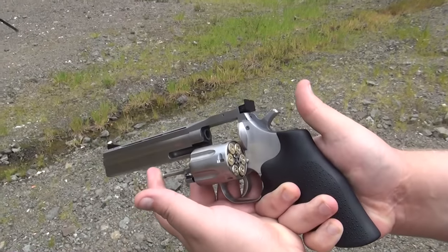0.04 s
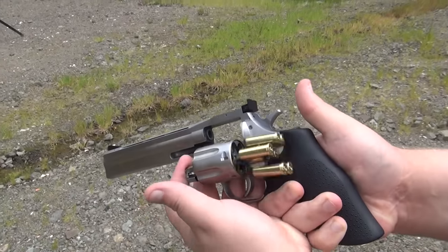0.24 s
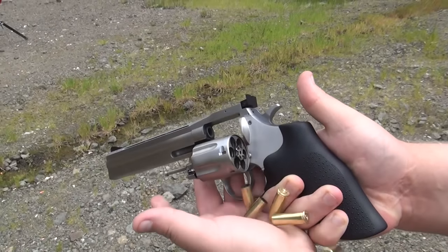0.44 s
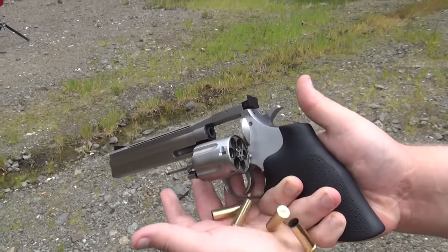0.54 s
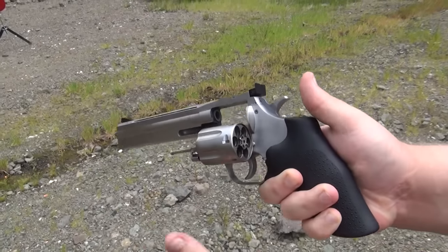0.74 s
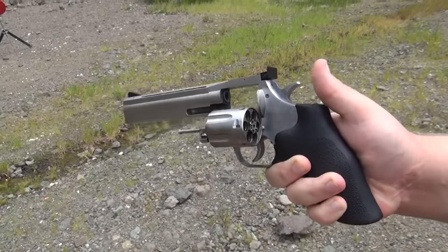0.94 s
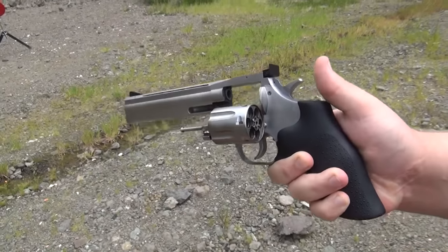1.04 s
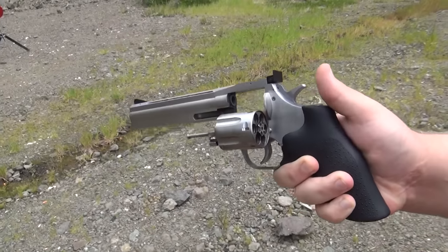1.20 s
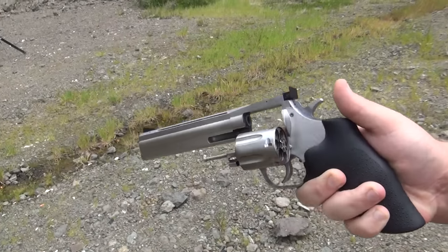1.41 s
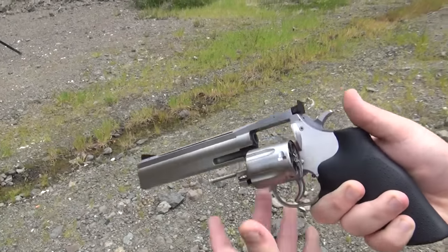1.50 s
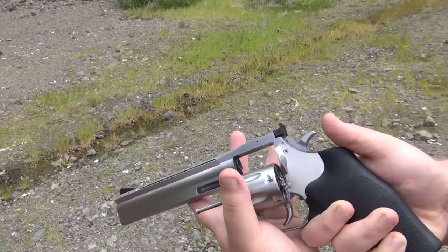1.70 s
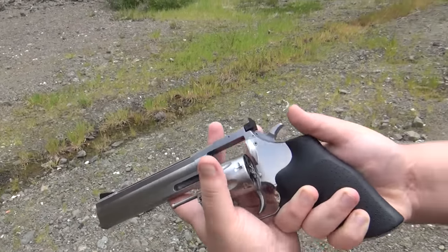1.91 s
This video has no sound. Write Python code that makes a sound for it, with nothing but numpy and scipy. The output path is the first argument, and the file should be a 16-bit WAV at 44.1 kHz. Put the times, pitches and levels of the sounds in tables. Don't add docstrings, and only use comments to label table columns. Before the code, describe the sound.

Spent brass cases clatter and ring as they are ejected from a revolver cylinder into a palm

```python
import sys
import numpy as np
from scipy import signal
from scipy.fft import rfft, irfft, next_fast_len
from scipy.io import wavfile
from scipy.ndimage import map_coordinates

SR = 44100
rng = np.random.default_rng(int(sys.argv[2]) if len(sys.argv) > 2 else 0)


def transcribe(signal):
    frames = np.atleast_2d(signal).T
    limited = np.clip(frames, -1, 1)
    pcm = np.round(limited * 32767).astype(np.int16)
    wavfile.write(sys.argv[1], SR, pcm)


def gain_from_db(level_db):
    decades = np.asarray(level_db, float) / 20
    return 10 ** decades


N = 85995


def filtered(x, response):
    size = next_fast_len(N + SR)
    return irfft(rfft(x, size) * response(np.fft.rfftfreq(size, 1 / SR)), size)[..., :N]


def thin(x, hz):
    return filtered(x, lambda f: (1j * f / (hz + 1j * f)) ** 4)


def pings(s, db, hz, t60):
    t = np.arange(SR // 32) / SR
    decay = gain_from_db(db[:, None] - 60 * t / t60[:, None])
    wave = decay * np.sin(2 * np.pi * hz[:, None] * t)
    at = np.round(s * SR).astype(int)[:, None] + np.arange(len(t))
    return np.bincount(at.ravel(), wave.ravel(), N + SR)[:N]


# (frequency [Hz], density [dB per Hz])
AIR_SPECTRUM = [(15, -14.5), (25, -7), (217, -0.5), (335, -4.5), (1100, -7.5), (2220, -14.5),
                (11900, -19.5), (16000, -20.5)]


def air():
    hz, db = np.transpose(AIR_SPECTRUM)
    hiss = rng.standard_normal((2, N))
    middle, side = filtered(hiss, lambda f: gain_from_db(np.interp(np.log(f + 1), np.log(hz), db)))
    level_db = -57
    return gain_from_db(level_db) * np.array([middle + 0.33 * side, middle - 0.37 * side]) / np.std(middle)


# (time [s], level [dB])
RUMBLE_SWELL = [
    (0.0, -101),
    (0.912, -56),
    (1.95, -81.5),
]


def rumble():
    s, db = np.transpose(RUMBLE_SWELL)
    noise = filtered(rng.standard_normal(N), lambda f: f / 300 / (1 + (f / 300) ** 3))
    return gain_from_db(np.interp(np.arange(N) / SR, s, db) - 1.5) * noise / np.std(noise)


WALL_MODES_DB = [-6.5, -10.5, -9.5, -12, -14, -23.5]


def contacts(s, knock_db, hollow_db, crack_db, tick_db, knock_hz, lead_hz, knock_t60):
    u, one = rng.random((len(s), 21)), np.ones(len(s))
    short_t60 = .0033 * one
    out = pings(s, knock_db, knock_hz, knock_t60 * one)
    out += pings(s, knock_db - 1, knock_hz * (1.35 + .2 * u[:, 20]), 9 / knock_hz)
    out += pings(s, hollow_db, 3037 * (.96 + .05 * u[:, 0]), 0.0065 * one)
    out += pings(s, crack_db, 3600 + 1700 * u[:, 1], short_t60)
    out += pings(s, tick_db - 4, lead_hz, 0.0067 * one)
    out += pings(s, tick_db + 3.5, lead_hz, 0.00043 * one)
    for k, db in enumerate(WALL_MODES_DB):
        late = s + .0003 * u[:, 2 + k]
        hz = 6000 + 1800 * (k + u[:, 14 + k])
        out += pings(late, tick_db + db + 6 * u[:, 8 + k], hz, short_t60)
    return out


# (time [s], knock level [dB], bright level [dB], knock frequency [Hz])
STEEL_KNOCKS = [(0.1386, -21.5, -44, 1510), (0.1576, -13.5, -32, 1860), (0.1949, -15.5, -24.5, 2200),
                (0.2084, -52, -62, 1630), (0.22, -9, -18, 1750), (0.2248, -2.5, -28, 1376),
                (0.3405, -9.5, -60, 950), (0.5476, -14, -62, 2346), (0.4592, -27, -65, 1930),
                (0.9003, -27.5, -69, 1980), (1.0405, -36, -41, 890), (1.0429, -14, -18, 1123),
                (1.0429, -10.5, -47, 1582), (1.0427, -23.5, -50, 570), (1.0594, -15.5, -18.5, 683),
                (1.1057, -22.5, -62, 660), (1.1146, -18.5, -60, 670), (1.2546, -27, -40.5, 1144),
                (1.6918, -35.5, -56, 653), (1.7293, -35.5, -58.5, 510)]


def steel(rows, rod_db):
    s, knock_db, bright_db, knock_hz = np.transpose(rows)
    lead_hz = 8000 + 2500 * rng.random(len(s))
    out = contacts(s, knock_db - 6, bright_db - 15, bright_db + 1, bright_db + 4,
                   knock_hz, lead_hz, knock_t60=0.015)
    one = np.ones(len(s))
    return out + pings(s, knock_db + rod_db, 4950 * one, 0.0036 * one)


# (time [s], level [dB])
SCRAPE_LEVEL = [(.19, -50), (.2, -33.5), (.24, -34), (.345, -34), (.36, -44), (.395, -36), (.41, -93.5),
                (.47, -48), (.53, -90)]
# (time [s], level [dB])
JOSTLE_LEVEL = [(1.04, -42), (1.06, -55.5), (1.11, -63.5), (1.13, -30), (1.17, -69), (1.255, -65.5),
                (1.3, -63), (1.325, -63), (1.36, -72), (1.41, -64), (1.5, -64)]


def scraping(curve, count):
    s, level = np.transpose(curve)
    u = rng.random((count, 3))
    clump = np.repeat(rng.random((count // 10, 3)), 10, axis=0)
    at = s[0] + (s[-1] - s[0]) * clump[:, 0] + .006 * u[:, 0]
    hz = 1100 * 14 ** (.7 * clump[:, 1] + .3 * u[:, 1]) ** .7
    db = np.interp(at, s, level) + 10 * u[:, 2] ** 4 + 10 * clump[:, 2] ** 2
    return pings(at, db, hz, 16 / hz)


# (time [s], pitch [Hz], level [dB])
SPRING_GLIDE = [
    (.194, 2150, -50),
    (.198, 2080, -31),
    (.214, 1620, -31),
    (.223, 1450, -38),
    (.228, 1340, -24),
    (.238, 1450, -29),
    (.243, 1500, -55),
]


def spring():
    s, hz, db = np.transpose(SPRING_GLIDE)
    t = np.arange(N) / SR
    shake_db = 5 * map_coordinates(rng.standard_normal(SR), [t * 400])
    phase = 2 * np.pi * np.cumsum(np.interp(t, s, hz)) / SR
    return gain_from_db(np.interp(t, s, db, -120, -120) + shake_db) * np.sin(phase)


# (time [s], tick level [dB], hollow level [dB], crack level [dB], leading wall mode [Hz])
EJECTED_CASES = [(.2321, -14, -46, -49, 9840), (.236, -11, -41, -26.5, 9710),
                 (.2427, -9, -20.5, -18, 14000), (.2493, -22, -50, -44, 7680), (.255, -6, -47, -27, 8380),
                 (.2657, -14, -34, -37, 10400), (.2741, -7.5, -31, -51, 11700),
                 (.2796, -13.5, -31, -32, 10300), (.2937, -17.5, -24, -32, 8350),
                 (.2973, -10.5, -23.5, -31.5, 8350), (.3093, -13, -31.5, -31.5, 8210),
                 (.316, -20, -28.5, -38.5, 8680), (.3224, -26, -25, -32, 9340),
                 (.3312, -16, -21.5, -24, 8400), (.3385, -6.5, -18.5, -15, 10460),
                 (.3417, -6, -17.5, -25.5, 10400), (.3449, -33, -17.5, -26.5, 9000),
                 (.3748, -9.5, -23, -29, 8580), (.3785, -22.5, -50, -50.5, 9000),
                 (.3875, -25, -25, -39.5, 8800), (.3905, -5.5, -3.5, -70, 9490),
                 (.4288, -21.5, -42, -40.5, 9580), (.4668, -9, -35, -21.5, 8930),
                 (.4747, -13.5, -20.5, -23, 10700), (.4825, -2, -30, -25, 9220),
                 (.4962, -15.5, -27, -15, 9200), (.5044, -28, -26.5, -21, 12600),
                 (.5112, -18.5, -33.5, -33.5, 8610), (.5187, -34.5, -37.5, -33, 10500),
                 (.5484, -8.5, -18, -28, 8230), (.6033, -39, -65.5, -70, 10100),
                 (.6299, -18, -41.5, -30.5, 9600)]
# (time [s], tick level [dB], hollow level [dB], crack level [dB], leading wall mode [Hz])
PALM_CASES = [(.8511, -49, -46.5, -57, 7440), (.886, -37, -40, -51, 9030), (1.0735, -49, -47, -41, 8700),
              (1.0969, -30.5, -39, -38, 9000), (1.1242, -8.5, -33, -28.5, 10340),
              (1.1274, -8.5, -47, -48, 10880), (1.1321, -35, -35, -44, 10120),
              (1.1412, -8.5, -46, -27, 8220), (1.1452, -12.5, -32, -36, 10750),
              (1.157, -31, -57, -44, 10000), (1.1855, -23, -53, -43, 10480), (1.244, -35, -63, -54, 9100),
              (1.249, -49, -64, -68, 10100), (1.2583, -26.5, -37.5, -57, 9200),
              (1.2802, -34, -56, -46, 9800), (1.2915, -44, -36, -40, 7600), (1.309, -32.5, -61, -66, 9700),
              (1.323, -38, -64, -61, 8300), (1.334, -43, -56, -47, 10400), (1.352, -18.5, -44, -31.5, 9700),
              (1.374, -45, -62, -63, 10600), (1.397, -36, -43, -52, 9430), (1.4017, -41, -53, -52, 10400),
              (1.4124, -24, -53, -39.5, 10600), (1.4237, -25, -58, -40, 10000),
              (1.4321, -27, -61, -51, 8800), (1.4474, -25.5, -61, -41, 10050),
              (1.456, -34.5, -57, -50, 10300), (1.4611, -44, -46, -46, 7470),
              (1.477, -39, -68, -53.5, 8300)]


def cases(rows, knock_db):
    s, tick_db, hollow_db, crack_db, lead_hz = np.transpose(rows)
    knock_hz = 1250 * (1 + .8 * rng.random(len(s)))
    return contacts(s, crack_db + knock_db, hollow_db + 4, crack_db + 6.5, tick_db,
                    knock_hz, lead_hz, knock_t60=0.0075)


MOUTH_HZ, UPPER_HZ = 6290, 15130


def ringing(rows, end_s, hz, edge_s, jump):
    s, start_db, end_db, upper_db = rows
    t, out = np.arange(N) / SR, np.zeros(N)
    ends, u = np.append(s[1:], end_s), rng.random((len(s), 4))
    for k in range(len(s)):
        span = slice(int(s[k] * SR), int((ends[k] + edge_s - edge_s * jump) * SR))
        a = t[span] - s[k]
        gate = np.clip(a / edge_s, 0, 1) * np.clip((a[-1] - a) / edge_s, 0, 1)
        db = start_db[k] + (end_db[k] - start_db[k]) * a / (ends[k] - s[k])
        phase = 2 * np.pi * (MOUTH_HZ * s[k] + hz[k] * a + jump * u[k, 0])
        mouth = gain_from_db(db) * np.sin(phase) + gain_from_db(db - 42.5) * np.sin(2 * phase)
        up = 2 * np.pi * UPPER_HZ * (1 + 0.0079 * (u[k, 1] - .5)) * a
        beat = 2 * np.pi * ((60 + 90 * u[k, 2]) * a + u[k, 3])
        pair = np.sin(up) + .55 * np.sin(up + beat)
        out[span] += gate * (mouth + gain_from_db(upper_db[k] - 320 * a) * pair)
    return out


# (time [s], start level [dB], end level [dB], frequency [Hz], upper mode level [dB])
RINGS_OUT = [(0.2553, -20, -22, 6308, -35), (0.266, -27, -32, 6305, -36), (0.2744, -25, -32, 6330, -25),
             (0.283, -24, -15, 6298, -30), (0.2995, -12, -15, 6310, -29), (0.311, -12, -24, 6303, -38),
             (0.3227, -24, -18, 6317, -36), (0.3317, -15, -15, 6266, -30), (0.345, -15, -15, 6265, -40),
             (0.3727, -9, -14, 6293, -27), (0.3908, -20, -27, 6320, -36), (0.412, -18, -18, 6316, -37),
             (0.4295, -30, -23, 6321, -36), (0.4671, -22, -24, 6300, -24), (0.475, -8, -13, 6323, -32),
             (0.4835, -19, -19, 6295, -46), (0.4962, 0, -9, 6325, -38), (0.5, -14, -22, 6312, -36),
             (0.5047, -14, -21, 6290, -35), (0.5115, -22, -34, 6300, -42), (0.5487, -17, -35, 6291, -45),
             (0.6302, -12, -63, 6292, -51)]
# (time [s], start level [dB], end level [dB], upper mode level [dB])
RINGS_HAND = [(0.85, -52.5, -57.5, -67), (0.8863, -44, -58, -46), (0.9, -55.5, -72, -56),
              (1.043, -33, -50, -42), (1.057, -21, -40, -30), (1.07, -33, -44, -60),
              (1.087, -38.5, -46, -48), (1.1246, -43, -28, -33), (1.1407, -21, -27, -42),
              (1.151, -18, -39, -32), (1.1655, -29.5, -37, -41), (1.186, -32.5, -45.5, -46),
              (1.215, -52, -41, -56), (1.233, -49, -35.5, -67), (1.258, -38.5, -45.5, -47),
              (1.285, -53, -49, -57), (1.31, -49, -48, -38), (1.332, -50, -50, -54),
              (1.359, -44, -46.5, -54), (1.397, -46, -65, -46), (1.439, -52, -43, -52),
              (1.457, -46, -56, -57.5)]


def brass():
    out, hand = np.transpose(RINGS_OUT), np.transpose(RINGS_HAND)
    hand_hz = MOUTH_HZ + 22 * rng.standard_normal(len(RINGS_HAND))
    rings = ringing(np.delete(out, 3, 0), end_s=.785, hz=out[3], edge_s=.0016, jump=.3)
    rings += ringing(hand, end_s=1.49, hz=hand_hz, edge_s=.004, jump=1)
    waver_db = map_coordinates(rng.standard_normal(SR), [np.arange(N) * 120 / SR])
    return rings * gain_from_db(waver_db)


# (time [s], level [dB])
AIR_PUFFS = [
    (0.275, -44.5),
    (0.39, -48),
    (0.485, -40.5),
]


def puffs():
    t, out = np.arange(N) / SR, np.zeros(N)
    for s, db in AIR_PUFFS:
        out += gain_from_db(db) * np.exp(-((t - s) / 0.0062) ** 2) * np.sin(2 * np.pi * 60 * (t - s))
    return out


def thump():
    start_s, level_db, fall_s = 1.1243, -4, 0.0026
    u = np.clip(np.arange(N) / SR - start_s, 0, None) / fall_s
    return gain_from_db(level_db) * (1 - np.exp(-u * 9)) * (np.exp(-u) - 0.25 * np.exp(-u / 3.5))


def scattered(x):
    t = np.arange(SR // 32) / SR
    scatter = rng.standard_normal((2, len(t))) * gain_from_db(-60 * t / 0.03)
    return signal.fftconvolve(x[None], scatter / np.linalg.norm(scatter[0]), axes=1)[:, :N]


def scene():
    rod, hand = STEEL_KNOCKS[:10], STEEL_KNOCKS[10:]
    rings = brass()
    brass_contacts = cases(EJECTED_CASES, knock_db=-13) + cases(PALM_CASES, knock_db=7)
    brass_contacts += scraping(SCRAPE_LEVEL, count=1500) + scraping(JOSTLE_LEVEL, count=3000)
    near = thin(brass_contacts, hz=900) + thin(steel(rod, rod_db=-12) + spring(), hz=800)
    low = thin(steel(hand, rod_db=-35), hz=200)
    side = np.array([[-1], [1]])  # left, right; pans below in dB
    direct = (near + rings) * gain_from_db(.4 * side) + low * gain_from_db(2.5 * side)
    pressure = (puffs() + thump()) * gain_from_db(.66 * side)
    wet = gain_from_db(-14) * scattered(near + low + .5 * rings)
    return direct + pressure + wet + air() + rumble()


def roll_off(x):
    return signal.sosfilt(signal.butter(12, 17140, fs=SR, output="sos"), x)


def record(dry):
    overloaded = dry / (1 + dry ** 4) ** 0.45
    top_hz = 16150
    mix = filtered(overloaded, lambda f: 1 / (1 + (f / top_hz) ** 60))
    return roll_off(mix)


dry = scene()
out = record(dry)
transcribe(out)
```